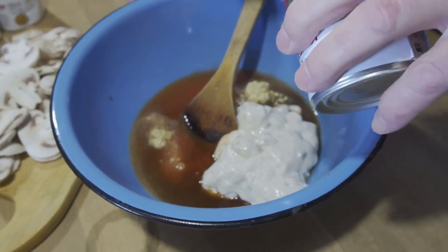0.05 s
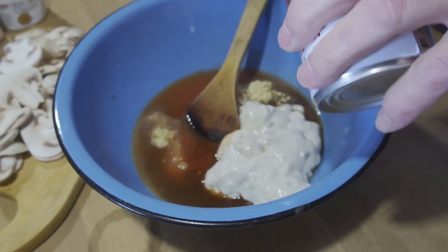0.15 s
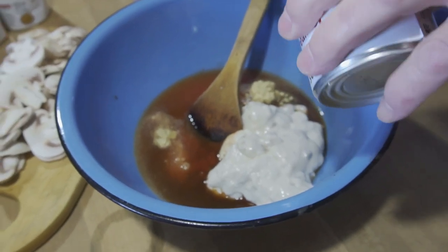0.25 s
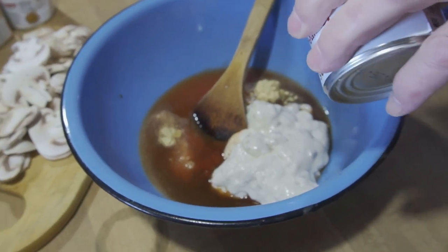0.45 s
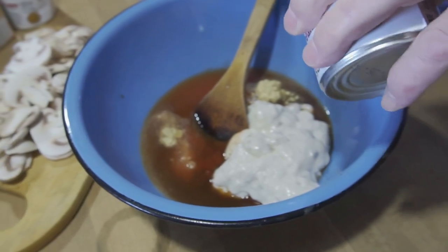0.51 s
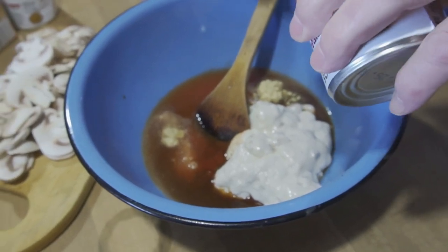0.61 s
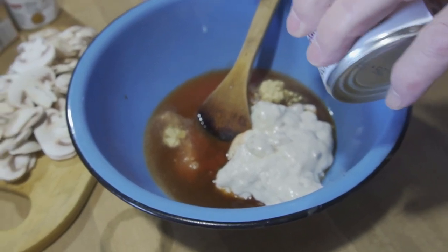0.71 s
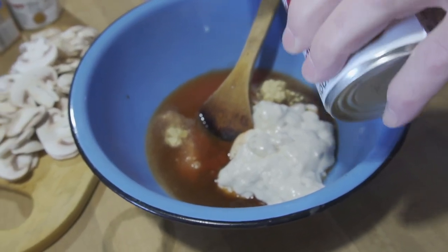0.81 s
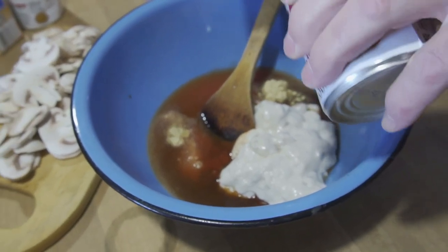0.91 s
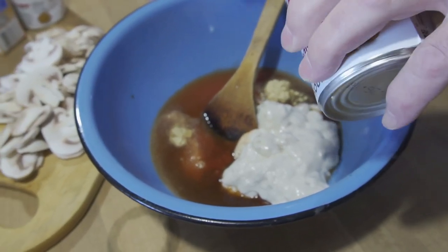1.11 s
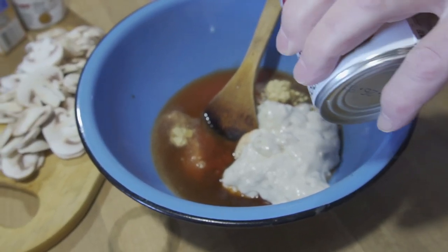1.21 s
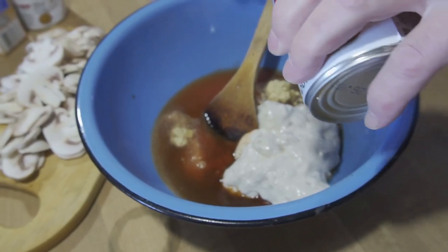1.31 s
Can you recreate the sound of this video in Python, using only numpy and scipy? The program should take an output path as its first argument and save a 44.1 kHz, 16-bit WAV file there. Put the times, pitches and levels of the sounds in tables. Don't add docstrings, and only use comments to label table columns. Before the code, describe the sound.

A metal spoon works inside a tin can, close up in a small kitchen. Faint scraping and light taps open, then sharp, hollow clanks come at 0.27-0.36 s. After a brief gap, a denser burst of bright knocks and squeaky scrapes runs 0.55-0.83 s. A softer, hollower knock lands near 1.0 s, followed by quiet ticking scrapes until 1.2 s. Short dry rings, brief room reflections, soft hiss and very faint low hum.

```python
import sys
import numpy as np
from scipy import signal
from scipy.fft import rfft, irfft
from scipy.io import wavfile
from scipy.ndimage import uniform_filter1d, minimum_filter1d

SR = 44100
rng = np.random.default_rng(int(sys.argv[2]) if len(sys.argv) > 2 else 0)


def rack_gain(trim_db):
    fader = np.asarray(trim_db, float)
    return 10 ** (fader / 20)


def store_pcm(level_fs):
    pcm = np.round(np.clip(level_fs, -1, 1) * 32767).astype(np.int16)
    wavfile.write(sys.argv[1], SR, np.atleast_2d(pcm).T)


N = 59535

# (frequency [Hz], density [dB])
HISS_SPECTRUM = [(15, -33), (25, -63), (97, -0.5), (349, -4.5), (2090, -12.5), (2820, -17), (3320, -14.5),
                 (14400, -35), (16500, -55)]
# (frequency [Hz], likeness [0-1])
HISS_LIKENESS = [(60, 0.91), (150, 0.92), (1000, 0.72), (15000, 0.13)]
# (frequency [Hz], level [dB])
HUM_PARTIALS = [(56.5, -55), (113, -74.5)]

# (frequency [Hz], level [dB], t60 [s])
BODY_MODES = [(740, -0.5, 0.17)]
WALL_MODES = [(1137.2, -0.5, 0.071), (1288, -11, 0.032)]
RIM_MODES = [(2076, -12, 0.1), (2198, -4.5, 0.033), (2500, -6, 0.025), (2704, -2.5, 0.054),
             (2790, -6, 0.085), (2857, -9, 0.088), (3223, -8, 0.067), (3460, -7, 0.031), (3750, -4, 0.023),
             (4133, -7.5, 0.044), (4340, -7, 0.021)]
SPOON_MODES = [(1600, -14, .03), (5152, -4, .025), (5602, -5, .025), (6502, -8, .025), (7802, -14, .025),
               (9902, -18, .015)]

# (start [s], length [s], pressure [dB], low ring [dB], grit [dB])
STROKE_EVENTS = [(0, 0.043, -47.5, 8.5, -5), (0.042, 0.038, -48.5, 1, 3.5), (0.138, 0.021, -42, -27, 4),
                 (0.177, 0.032, -49, -5, 7), (0.201, 0.036, -35.5, -15, 8.5),
                 (0.233, 0.036, -43.5, -16, 7.5), (0.267, 0.033, -26, -5, -32), (0.318, 0.031, -30, -8, 1),
                 (0.359, 0.028, -26.5, -5, 2), (0.552, 0.01, -28.5, -20, 7), (0.574, 0.04, -34, -12, 1),
                 (0.61, 0.09, -31, -4, 1), (0.712, 0.15, -39, -3, 2.5), (0.803, 0.024, -33, -3, 2),
                 (0.828, 0.047, -31, 0, -3), (0.87, 0.095, -35, -2.5, -11), (0.966, 0.035, -26, -21, 3.5),
                 (0.991, 0.087, -62, -6, -16), (1.046, 0.053, -46, 8, 4.5), (1.095, 0.049, -49, 14, 7),
                 (1.138, 0.072, -45.5, 5.5, 9)]
# (frequency [Hz], level [dB])
GRIT_SPECTRUM = [(350, -30), (740, -4), (1150, -5), (1600, -15), (2700, -1), (4100, -2), (8000, -13),
                 (15500, -30)]
# (start [s], length [s], from [Hz], to [Hz])
SLIDE_NOTES = [(.573, .034, 2650, 2230), (.582, .026, 2980, 2790), (.618, .05, 2040, 2070),
               (.576, .04, 740, 740), (.612, .045, 739, 740), (.68, .022, 2080, 2080),
               (.625, .075, 2760, 2740), (.578, .016, 4700, 5200), (.592, .018, 4420, 4250),
               (.593, .012, 1150, 1140), (.625, .025, 3560, 3540), (.816, .05, 2090, 2100),
               (.87, .07, 2150, 2150), (.815, .045, 740, 740), (.828, .042, 2790, 2730),
               (.878, .03, 2780, 2700), (.83, .06, 3600, 3620), (.918, .02, 1140, 1140),
               (.318, .03, 2720, 2860), (.324, .021, 2240, 2300), (.333, .016, 4020, 4120),
               (.316, .042, 1140, 1150), (.272, .04, 740, 740), (.274, .028, 1950, 2040),
               (.276, .024, 2400, 2460), (.366, .028, 2050, 2100), (.362, .028, 736, 736),
               (0, .04, 2070, 2070), (1.0, .04, 2060, 2060), (.97, .028, 2700, 2700),
               (1.11, .08, 1400, 1700), (1.14, .072, 1950, 2250), (1.15, .035, 3600, 3540),
               (1.19, .022, 3300, 3400), (1.11, .06, 4650, 5200), (1.1, .06, 1130, 1140),
               (1.045, .025, 738, 738)]
SLIDE_LEVELS = [-21.5, -13.5, -26, -30.5, -25, -34.5, -31, -40, -24.5, -22.5, -31, -27.5, -35.5, -28.5, -27,
                -28, -34, -33, -17.5, -23, -22, -25.5, -30, -29, -24.5, -28, -44, -42, -38.5, -29.5, -43.5,
                -43, -37, -37.5, -45, -44, -30]

# (frequency [Hz], t60 [s])
ROOM_DECAY = [(400, 0.26), (1000, 0.33), (2500, 0.35), (6000, 0.32), (12000, 0.44)]
# (frequency [Hz], likeness [0-1])
ROOM_LIKENESS = [(500, 0.9), (1500, 0.95), (3000, 0.65), (10000, 0.58)]

# (time [s], level [dB], body ring [dB], wall ring [dB], crack [dB])
KNOCK_EVENTS = [(0.0634, -29.5, -6, -21, -34), (0.1441, -30.5, -17, -20, 2), (0.2024, -26, -2, -22, -20),
                (0.2142, -29, -11, -19, -22), (0.2228, -30.5, -28, -11, -0.5),
                (0.2641, -35.5, -20, -21, 9.5), (0.2698, -7, -13.5, -5, -10),
                (0.2933, -11.5, -19, -5, -9.5), (0.3339, -16.5, -29, -25, -11.5),
                (0.3626, -2.5, -13, -15.5, -18.5), (0.555, -17, -7.5, -23, -4.5),
                (0.5716, -2, -40, -16.5, -16.5), (0.5791, -8.5, -17, -23, -17), (0.5837, -12, -33, -14, -9),
                (0.5925, -11, -28, -3, -8.5), (0.6115, -1, -8.5, -25, -13.5), (0.6965, -22.5, -39, -29, -9),
                (0.736, -14, -15, -20, -3.5), (0.79, -4.5, -22, -10, -2), (0.814, -4, -27.5, -20, -8.5),
                (0.8324, -10, -6, -34, -30), (0.9497, -27, -12, -11, -32), (0.9946, -18, 2, 6.5, -11)]
# (frequency [Hz], level [dB])
CRACK_SPECTRUM = [(500, -30), (1200, -10), (1650, -18), (2800, -4), (5000, 0), (9000, -5), (15500, -17)]
# (time [s], frequency [Hz], level [dB], t60 [s])
SPOT_NOTES = [(.2698, 2626, -11.5, 0.039), (.2698, 1250, -10.5, 0.024), (.2698, 4375, -22, 0.074),
              (.2933, 3400, -24, .025), (0.3633, 2710, -15, 0.062), (0.3613, 4210, -17, 0.037),
              (0.3629, 3200, -20, 0.095), (.555, 2270, -17, 0.015), (.555, 3750, -21, 0.033),
              (0.5717, 2727, -7.5, 0.034), (0.5717, 4370, -14, 0.023), (0.5714, 1250, -12.5, 0.022),
              (0.5786, 2720, -13.5, 0.027), (0.5927, 2870, -17, 0.026), (0.6117, 2767, -2.5, 0.046),
              (.6115, 3545, -8.5, 0.032), (0.6123, 4250, -9.5, 0.02), (.736, 1965, -19.5, 0.042),
              (.736, 1650, -24, 0.029), (.79, 2896, -7.5, 0.073), (.79, 1171, -11, 0.069),
              (.79, 2350, -15, 0.033), (0.813, 2804, -3, 0.049), (.814, 2100, -18, 0.11),
              (.814, 3480, -17.5, 0.027)]
# (time [s], level [dB])
RIDGE_TICKS = [(1.0478, -37), (1.0997, -35), (1.118, -33), (1.1325, -34), (1.1431, -35), (1.1545, -28),
               (1.1655, -30), (1.176, -28.5), (1.186, -29), (1.197, -36), (1.207, -31.5), (.9784, -28),
               (.9819, -27), (.588, -22), (.678, -29)]
# (frequency [Hz], level [dB], t60 [s])
TICK_MODES = [(771, -4.5, 0.045), (1570, -18, .02), (2160, -8, 0.01), (3570, -3.5, 0.026),
              (4970, -4, 0.0091), (6950, -18.5, 0.025)]

HISS_DB, ROOM_DB, PORT_DB, LEFT_DB = -51.5, -9.5, -14, -1.3
STROKE_RISE_S, STROKE_FALL_S = 0.007, 0.012
GRAINS_PER_S, GRAIN_DB = 3000, 3.2
RING_WIDTH, DAMPING = 2.8, 0.8
SLIDE_WIDTH = 0.026
PURE_FROM_DB, PURE_SPAN_DB = -58, 36
KNOCK_DB, RIM_KNOCK_DB, SPOON_DB = -9, -3.5, 4
SPREAD_DB, DETUNE = 2.5, 0.005
CRACK_T60_S = 0.011
LOW_CUT_HZ, TOP_HZ, EDGE_HZ = 525, 14800, 16750
CEILING = 0.93


def evened(x):
    return x / np.sqrt(np.mean(x ** 2) + 1e-20)


def read(points, hz):
    f, value = np.transpose(points)
    return np.interp(np.log(hz + 1), np.log(f + 1), value)


def colour(x, spectrum):
    gain = rack_gain(read(spectrum, np.fft.rfftfreq(len(x), 1 / SR)))
    return evened(irfft(rfft(x) * gain, len(x)))


def highpassed(x, order, hz):
    return signal.sosfilt(signal.butter(order, hz, "high", fs=SR, output="sos"), x)


def kitchen():
    hz = np.fft.rfftfreq(N, 1 / SR)
    a, b = rfft(rng.standard_normal((2, N)))
    same = np.clip(read(HISS_LIKENESS, hz), -1, 1)
    pair = np.array([a, same * a + np.sqrt(1 - same ** 2) * b])
    hiss = evened(irfft(pair * rack_gain(read(HISS_SPECTRUM, hz)), N))
    t = np.arange(N) / SR
    hum = np.zeros(N)
    for f, db in HUM_PARTIALS:
        waver_db = 1.5 * np.sin(2 * np.pi * (6.65 * t + rng.random()))
        hum += np.sqrt(2) * rack_gain(db + waver_db) * np.sin(2 * np.pi * f * t)
    return rack_gain(HISS_DB) * hiss + hum


def resonate(x, hz, width):
    turn = np.exp(2j * np.pi * np.cumsum(hz * np.ones(len(x))) / SR)
    r = np.exp(-np.pi * width / SR)
    ringing = turn * signal.lfilter([1], [1, -r], x / turn)
    return np.sqrt(2 * (1 - r * r)) * ringing.real


def stroke_pressure(start, length):
    t = np.arange(N) / SR - start
    rise = t / STROKE_RISE_S + (start <= 0.001)
    fall = (length - t) / STROKE_FALL_S + 0.5
    return np.clip(np.minimum(rise, fall), 0, 1) ** 2


def grains():
    size = rack_gain(GRAIN_DB * np.minimum(rng.exponential(1, N), 5))
    size = size * (rng.random(N) < GRAINS_PER_S / SR)
    return evened(size * rng.choice([-1., 1.], N) + 0.5 * rng.standard_normal(N))


def singing_wall(slips):
    out = np.zeros(N)
    for (start, length, from_hz, to_hz), db in zip(SLIDE_NOTES, SLIDE_LEVELS):
        span = slice(int(start * SR), int(start * SR) + 9000)
        t = np.arange(N)[span] / SR
        hz = np.interp(t, [start, start + length], [from_hz, to_hz])
        width = SLIDE_WIDTH * from_hz * np.sqrt(min(from_hz / 2000, 1))
        pure = np.clip((db - PURE_FROM_DB) / PURE_SPAN_DB, 0, 0.93)
        push = pure * np.sqrt(2 * np.pi * width / SR) * np.sin(2 * np.pi * np.cumsum(hz) / SR)
        rough = np.sqrt(1 - pure ** 2) * np.roll(slips, int(from_hz) * 7)[span]
        out[span] += rack_gain(db) * resonate(stroke_pressure(start, length)[span] * (push + rough), hz, width)
    return out


def scrape():
    low, high, grit = np.zeros((3, N))
    for start, length, db, low_db, grit_db in STROKE_EVENTS:
        pressure = stroke_pressure(start, length)
        high += rack_gain(db) * pressure
        low += rack_gain(db + low_db) * pressure
        grit += rack_gain(db + grit_db) * pressure
    slips = grains()
    rubbed = np.zeros(N)
    groups = ((low, BODY_MODES, -11), (low, WALL_MODES, -6), (high, RIM_MODES, -5), (grit, SPOON_MODES[:4], -14))
    for drive, modes, db in groups:
        for hz, mode_db, t60 in modes:
            rub = drive * (slips + grains()) / np.sqrt(2)
            rubbed += rack_gain(db + mode_db) * resonate(rub, hz, RING_WIDTH / (t60 * DAMPING))
    soften = signal.butter(2, 6000, fs=SR, output="sos")
    ringing = signal.sosfilt(soften, rubbed + singing_wall(slips))
    return ringing + rack_gain(-5) * grit * colour(slips, GRIT_SPECTRUM)


def room(x):
    taps = np.zeros((3, SR // 2))
    at = np.arange(200, SR // 2 - 20, 20)
    at = at + rng.integers(0, 20, (3, len(at)))
    np.put_along_axis(taps, at, rng.choice([-1., 1.], at.shape), 1)
    hz, t, z = signal.stft(taps, SR, nperseg=256)
    same = np.clip(read(ROOM_LIKENESS, hz), 0, 1)[:, None]
    z = same * z[2] + np.sqrt(1 - same ** 2) * z[:2]
    decay = rack_gain(-60 * t / read(ROOM_DECAY, hz)[:, None])
    tail = signal.istft(z * decay, SR, nperseg=256)[1]
    return signal.fftconvolve(x[None], tail / np.linalg.norm(tail[0]), axes=1)[:, :N]


def knocks():
    modes = np.array(BODY_MODES + WALL_MODES + RIM_MODES + SPOON_MODES)
    mode_hz, mode_db, t60 = modes.T[:, :, None]
    luck = rng.standard_normal((len(KNOCK_EVENTS), 2, len(modes), 1))
    snap = colour(rng.standard_normal(N), CRACK_SPECTRUM)
    out = np.zeros(N)
    for (s, db, body_db, wall_db, crack_db), (level_luck, pitch_luck) in zip(KNOCK_EVENTS, luck):
        at = int(s * SR)
        span = slice(at, min(at + 9000, N))
        t = np.maximum(np.arange(N)[span] / SR - s, 0)
        group_db = np.repeat([body_db + 5, wall_db + 5, RIM_KNOCK_DB, crack_db + SPOON_DB],
                             [len(BODY_MODES), len(WALL_MODES), len(RIM_MODES), len(SPOON_MODES)])
        level = db + KNOCK_DB + group_db[:, None] + mode_db + SPREAD_DB * level_luck - 60 * t / t60
        wave = np.sin(2 * np.pi * mode_hz * (1 + DETUNE * pitch_luck) * t)
        ringing = (rack_gain(level) * np.sign(pitch_luck) * wave).sum(0)
        out[span] += np.minimum(t / 0.00031, 1) * ringing
        crack = rack_gain(db + crack_db - 60 * t / CRACK_T60_S) * snap[span]
        out[span] += np.minimum(t / 0.00024, 1) * crack
    return out


def ring(s, hz, db, t60):
    t = np.maximum(np.arange(N) / SR - s, 0)
    return rack_gain(db - 60 * t / t60) * np.sin(2 * np.pi * hz * t)


def struck_spots():
    return sum(ring(*note) for note in SPOT_NOTES)


def ridge_ticks():
    snap = colour(rng.standard_normal(N), CRACK_SPECTRUM)
    snap_decay_db = -60 * np.arange(400) / SR / 0.01
    trips, snaps = np.zeros((2, N))
    for s, db in RIDGE_TICKS:
        span = slice(int(s * SR), int(s * SR) + 400)
        trips[span.start] = rack_gain(db)
        snaps[span] += rack_gain(db - 13.5 + snap_decay_db) * snap[span]
    tick = sum(ring(0, *mode) for mode in TICK_MODES)[:3000]
    return snaps + signal.oaconvolve(trips, tick)[:N]


def port_difference(can):
    skew = rng.standard_normal(60) * rack_gain(-np.arange(60) / 2)
    smeared = np.convolve(can, skew / np.linalg.norm(skew))[:N]
    side = rack_gain(PORT_DB) * highpassed(smeared, 2, 4500)
    return np.array([side, -side])


def scene():
    background = kitchen()
    can = highpassed(scrape() + knocks() + struck_spots() + ridge_ticks(), 4, LOW_CUT_HZ)
    heard = can + port_difference(can) + rack_gain(ROOM_DB) * room(can)
    balance = rack_gain(np.array([[LEFT_DB / 2], [-LEFT_DB / 2]]))
    return heard * balance + background


def band_limit(x):
    return signal.sosfilt(signal.butter(12, 16670, fs=SR, output="sos"), x)


def record(dry):
    gain = np.minimum(CEILING / (abs(dry).max(0) + 1e-9), 1)
    limited = dry * uniform_filter1d(minimum_filter1d(gain, size=400), size=400)
    roll_off = signal.firwin(31, TOP_HZ, fs=SR)
    band_edge = signal.firwin(255, EDGE_HZ, fs=SR)
    mix = signal.oaconvolve(limited, np.convolve(roll_off, band_edge)[None], "same")
    return band_limit(mix)


dry = scene()
out = record(dry)
store_pcm(out)
```